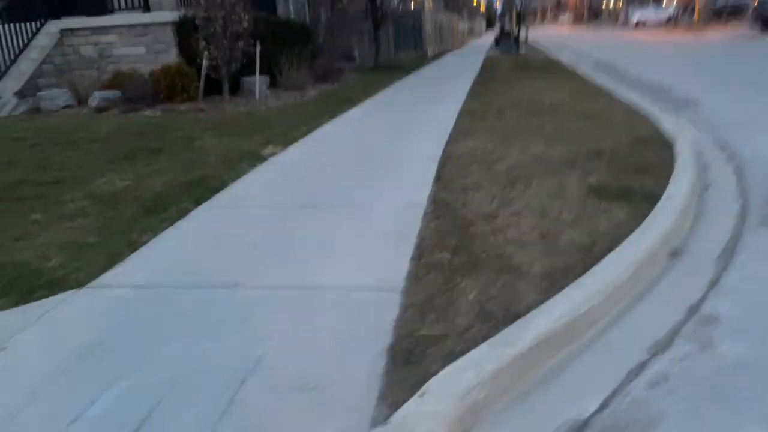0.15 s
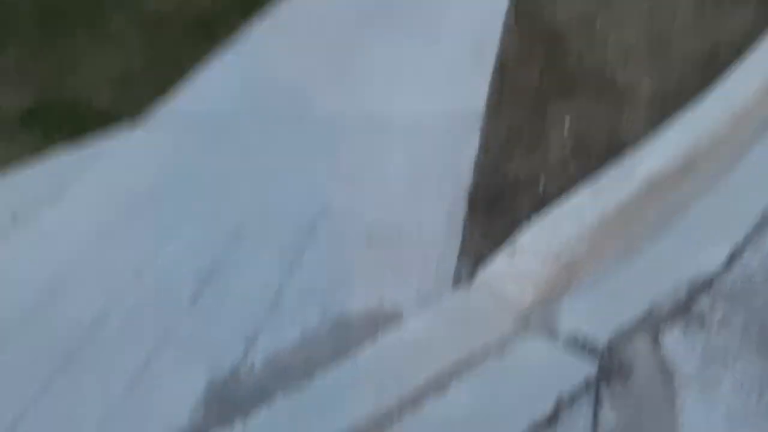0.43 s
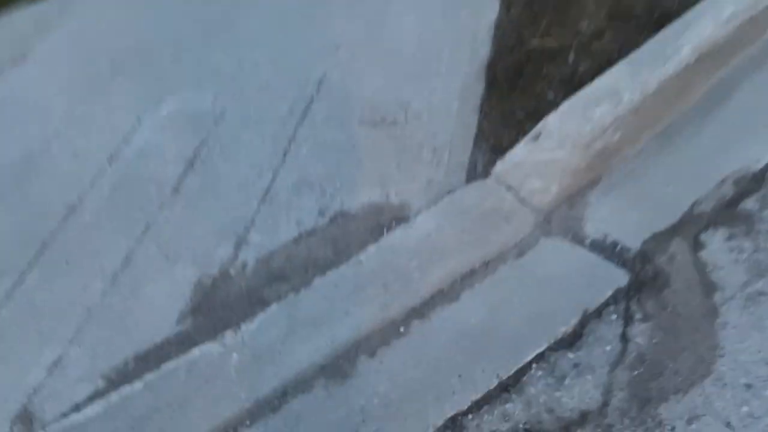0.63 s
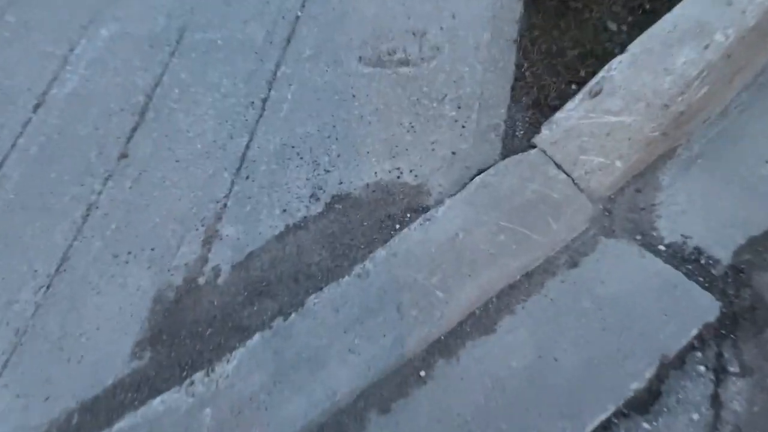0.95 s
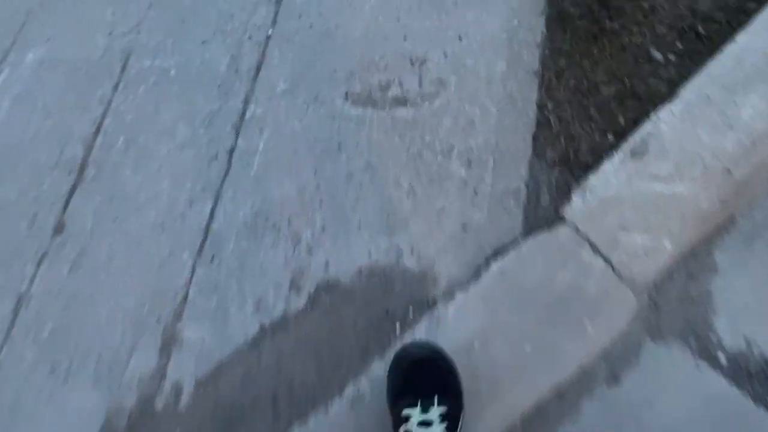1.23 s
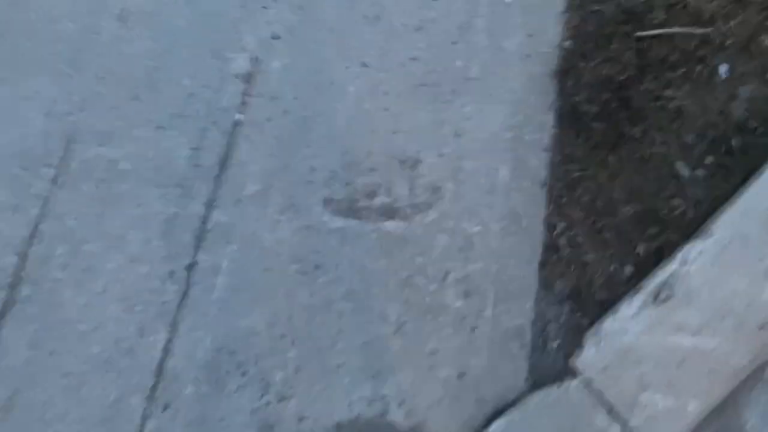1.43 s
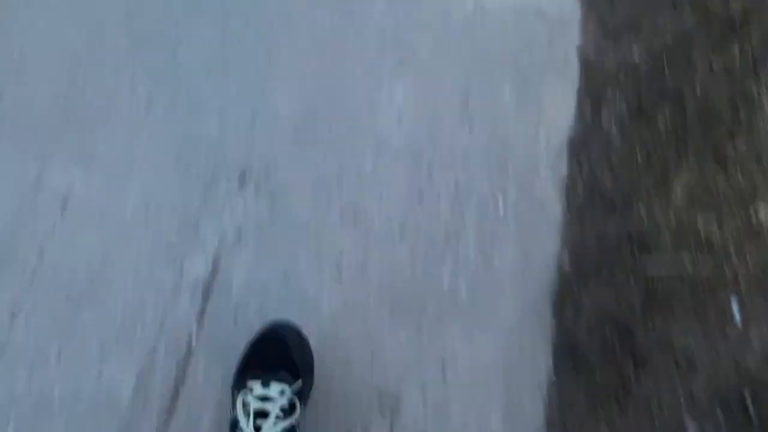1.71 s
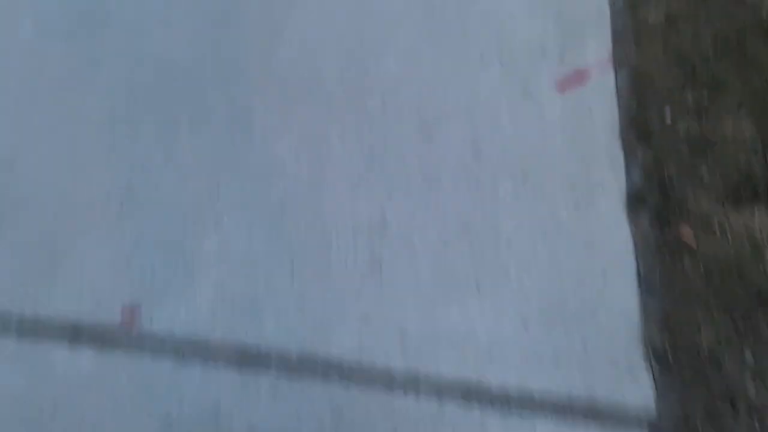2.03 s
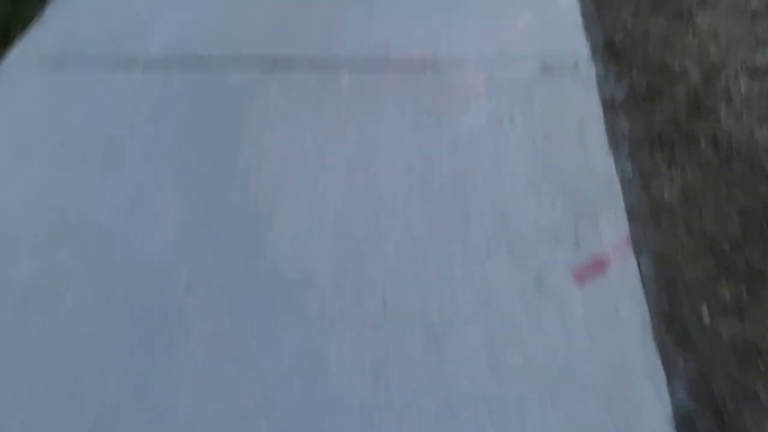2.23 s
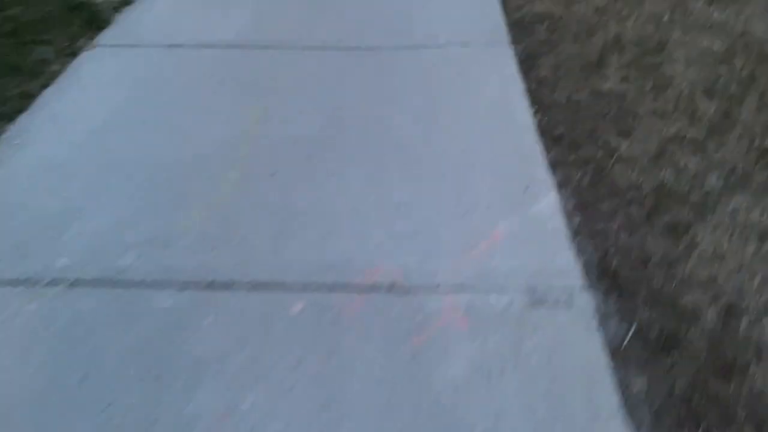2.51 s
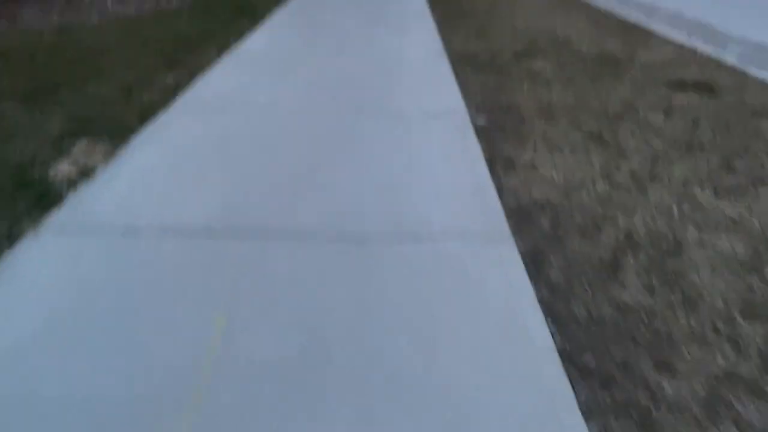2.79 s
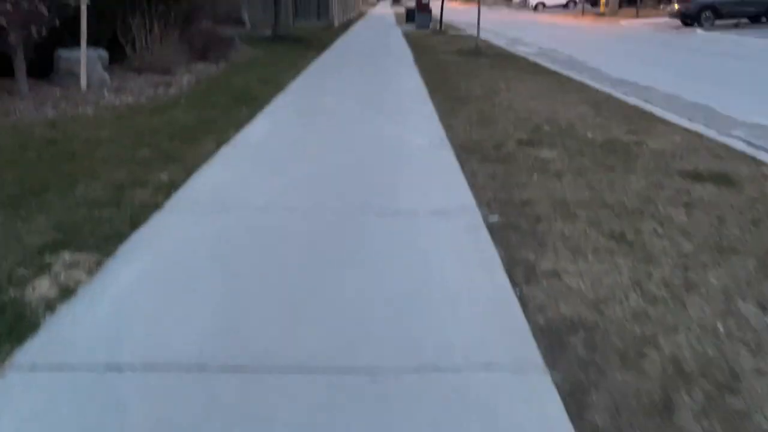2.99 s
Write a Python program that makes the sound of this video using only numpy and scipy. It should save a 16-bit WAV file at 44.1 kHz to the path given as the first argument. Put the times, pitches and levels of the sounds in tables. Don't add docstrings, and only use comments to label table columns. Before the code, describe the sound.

Footsteps thud and crunch over gritty pavement while wind puffs bump the microphone

```python
import sys
import numpy as np
from scipy import signal
from scipy.fft import rfft, irfft, next_fast_len
from scipy.io import wavfile
from scipy.ndimage import uniform_filter1d, map_coordinates

SR = 44100
rng = np.random.default_rng(int(sys.argv[2]) if len(sys.argv) > 2 else 0)


def volts_from_db(level):
    exponent = np.asarray(level, float) / 20
    return 10 ** exponent


def waveform_to_disk(signal):
    frames = np.transpose(np.atleast_2d(signal))
    scaled = np.clip(frames, -1, 1) * 32767
    samples = np.round(scaled).astype(np.int16)
    wavfile.write(sys.argv[1], SR, samples)


N = 138915

# (frequency [Hz], level [dB per Hz])
HUM_COLOR = [(100, -6.5), (1200, -10), (2500, -16.5), (16000, -84)]
# (time [s], level [dB])
AIR_FLOW = [(0, -41.5), (.25, -31.5), (.45, -28), (.6, -31.5), (.8, -27.5), (1, -33.5), (1.3, -23),
            (1.55, -30), (1.85, -29), (1.97, -34), (2.25, -31), (2.4, -29.5), (2.58, -37.5), (3.15, -34)]
# (frequency [Hz], level [dB per Hz])
RUMBLE_COLOR = [(25, -6), (52, 4.5), (140, -3), (300, -16), (600, -42.5)]
# (center time [s], peak level [dB], pitch [Hz], length [s])
AIR_PUFFS = [(0.501, -19.5, 79.3, 0.11), (0.54, -10, 77, 0.018), (0.713, -17, 85.6, 0.017),
             (0.903, -21.5, 79.4, 0.053), (1.106, -18.5, 86.5, 0.022), (1.141, -15, 69, 0.024),
             (1.196, -6.5, 63, 0.039), (1.265, -14, 105, 0.044), (1.315, -7, 87, 0.0067),
             (1.428, -10, 85, 0.011), (1.45, -9, 70, 0.009), (1.8, -18.5, 64.5, 0.02),
             (2.033, -27, 59, 0.043), (2.151, -20, 57.6, 0.023), (2.221, -11, 76.6, 0.0075),
             (2.301, -9.5, 65, 0.057), (2.364, -10.5, 62, 0.021), (2.452, -18.5, 76.6, 0.022),
             (2.724, -21, 73, 0.031), (2.818, -22, 71.6, 0.053), (2.889, -19.5, 67.6, 0.033)]
# (time [s], level [dB])
RUSTLE = [(0, -42.5), (.15, -48.5), (.35, -40.5), (.65, -42), (.87, -35), (1.1, -41.5), (1.55, -42),
          (1.9, -39.5), (2.1, -39.5), (2.4, -40.5), (2.62, -43.5), (2.85, -39), (3.15, -43)]
# (frequency [Hz], level [dB per Hz])
CLOTH_COLOR = [(250, 8.5), (700, 4), (2300, 0), (3200, -4.5), (6700, -6.5), (10000, -8), (13500, -37),
               (16300, -48)]
# (pitch [Hz], level [dB], time to fade by 60 dB [s])
TAG_MODES = [(6770, 2.5, 0.013), (9200, -2.5, 0.0076), (10260, -1.5, 0.0076), (15700, -8, .01)]
# (time [s], peak level [dB], ring over snap [dB])
TAG_TICKS = [(0.3186, -29.5, -25), (0.808, -25.5, -7), (0.9115, -27, -1), (0.9765, -25.5, -3.5),
             (1.201, -46, -11), (1.3187, -28, -18), (1.517, -24.5, -4), (1.629, -29.5, 2),
             (1.6362, -24.5, -9), (1.6941, -38, 12), (1.744, -35.5, 11.5), (1.7614, -18.5, -6),
             (1.9367, -20, 3.5), (1.9474, -22, 4.5), (1.9743, -34.5, 15.5), (2.011, -30.5, 3),
             (2.074, -33.5, 5), (2.3967, -25, -22), (2.9663, -32, -15), (2.98, -40, -13), (3.01, -37, -13),
             (3.053, -30.5, -14), (0.038, -46, 10), (.757, -28.5, -15), (1.045, -41, 11.5),
             (1.182, -36, 7.5), (1.712, -39, 10), (1.958, -36, 8), (2.085, -38, 5), (2.9105, -37, 10),
             (3.0864, -44, 11)]
# (frequency [Hz], width [Hz], level [dB])
SOLE_MODES = [(1120, 2000, 7), (2450, 1880, 6.5), (5550, 1650, 1.5), (11200, 4800, -7.5)]
# (start time [s], length [s], level [dB], treble [dB])
SOLE_SCUFFS = [
    (1.319, .054, -29, 0),
    (1.35, .022, -28, -12),
    (1.275, .03, -40, 0),
    (.808, .06, -44, 6),
    (.908, .018, -40, 4),
    (.7, .06, -43, -2),
    (1.845, .06, -42, 0),
]
# (time [s], peak level [dB], pitch [Hz], snap over ring [dB])
GRIT_CRACKS = [(0.209, -26.5, 1580, -30), (0.26, -19, 1450, 23), (0.267, -22.5, 1920, 22.5),
               (0.32, -25.5, 1630, -8), (0.361, -25.5, 2030, -11), (0.517, -25, 1060, 24),
               (0.64, -26.5, 1730, -24), (0.718, -20, 2080, 27.5), (1.289, -18, 1000, -18),
               (1.293, -8, 750, 13), (1.405, -21, 765, -21), (1.744, -31, 1860, -5),
               (1.761, -22.5, 696, -13), (1.837, -14, 664, 20), (1.928, -23.5, 3750, -24),
               (1.947, -27.5, 776, -13), (1.962, -23, 2470, -8), (2.171, -27.5, 860, -15),
               (2.333, -20, 1150, -2), (2.375, -16.5, 1210, -20), (2.397, -25.5, 2200, -13),
               (2.428, -20, 1970, -25), (2.702, -27, 750, -9), (2.821, -12.5, 1750, -16),
               (2.892, -18.5, 1800, -9), (.014, -32.5, 785, -7), (.037, -31, 1480, -5),
               (0.103, -37.5, 960, -10), (.431, -36, 1190, -5), (0.795, -28.5, 1460, 12),
               (0.841, -26.5, 1300, 1), (.851, -33, 1400, -3), (.979, -27, 840, -5),
               (.986, -24.5, 1950, -7), (1.138, -27.5, 1370, -10), (1.181, -32, 1760, 1),
               (1.2, -29.5, 2200, -6), (1.245, -32, 3330, 31), (1.712, -43, 810, 10),
               (1.896, -28.5, 1340, 14), (2.086, -28.5, 1730, -5), (2.094, -26, 1500, 3),
               (2.745, -26, 1400, 0), (2.795, -25.5, 1500, 21), (2.872, -34, 4030, 16),
               (2.914, -33, 1400, -5), (2.967, -33, 5240, -4), (2.974, -24, 5400, -4),
               (3.01, -23.5, 6000, 0), (3.053, -31.5, 770, 5), (1.355, -18.5, 1280, 5),
               (1.3615, -23, 2370, 0), (1.808, -26.5, 660, 2), (1.842, -19.5, 700, -2)]
# (time [s], peak level [dB], pitch [Hz], time to fade by 60 dB [s])
LANDINGS = [(0.206, -14, 197, 0.026), (0.533, -10.5, 154, 0.03), (0.721, -16.5, 186, 0.042),
            (1.2939, 2, 213, 0.012), (1.365, -14.5, 407, 0.013), (1.421, -20.5, 156, 0.059),
            (1.81, -7.5, 212, 0.026), (1.84, -3, 217, 0.016), (2.287, -8.5, 220, 0.02),
            (2.7985, -11.5, 190, 0.025), (2.365, -21, 430, 0.016), (1.806, -40, 427, 0.0091),
            (2.283, -29.5, 390, 0.01), (2.702, -15, 330, 0.0072)]
# (frequency [Hz], shared part [0 to 1])
PORTS_ALIKE = [(100, .78), (600, .5), (2500, .25), (5000, .5), (7300, .98), (9200, .98), (12000, .8)]
# (frequency [Hz], phase [radians])
LEFT_LEAD = [(400, 0), (1200, .8), (3500, 0), (4800, 0), (6600, -1.3), (8350, -3.14), (10900, -6),
             (12100, -6.5), (13900, -9), (15000, -9.42)]


def unit(x):
    return x / np.sqrt(np.mean(x ** 2) + 1e-20)


def along(points, hz):
    f, v = np.transpose(points)
    return np.interp(np.log(hz + 1), np.log(f + 1), v)


def curve(rows):
    return np.interp(np.arange(N) / SR, *np.transpose(rows))


def wobble(rate):
    knots = rng.standard_normal(int(N * rate / SR) + 4)
    return map_coordinates(knots, [np.arange(N) * rate / SR])


def filtered(x, response):
    m = next_fast_len(x.shape[-1] + 8192)
    shaped = rfft(x, m) * response(np.fft.rfftfreq(m, 1 / SR))
    return irfft(shaped, m)[..., :x.shape[-1]]


def peak(f, hz, width_hz):
    return 1j * f * width_hz / (hz * hz - f * f + 1j * f * width_hz)


def add(out, s, x):
    i = max(round(s * SR), 0)
    out[..., i:i + x.shape[-1]] += x[..., :N - i]


def spread(pair, spectrum):
    def middle_and_side(f):
        turn = np.arccos(np.clip(along(PORTS_ALIKE, f), 0, 1)) / 2
        color = volts_from_db(along(spectrum, f)) * (f > spectrum[0][0] / 2)
        return color * np.array([np.cos(turn), np.sin(turn)])

    mid, side = filtered(pair, middle_and_side)
    return unit(np.array([mid + side, mid - side]))


def town_hum():
    return volts_from_db(-47.5) * spread(rng.standard_normal((2, N)), HUM_COLOR)


def air():
    lumps_db, puff_spread, pitch_sag = 2, 0.2, 0.2
    lumps = np.array([wobble(6.79), wobble(9.3)]) + wobble(24.59)
    rumble = spread(rng.standard_normal((2, N)), RUMBLE_COLOR)
    out = volts_from_db(curve(AIR_FLOW) + lumps_db * lumps) * rumble
    t = np.arange(-SR // 10, SR // 10) / SR
    side = np.array([[1], [-1]])
    for s, db, hz, length in AIR_PUFFS:
        phase = rng.uniform(0, 2 * np.pi)
        skew, gain = rng.normal(0, puff_spread, 2)
        swell = np.exp(-2.8 * (t / length) ** 2)
        turn = 2 * np.pi * hz * t * (1 - pitch_sag * t / length)
        level = volts_from_db(db + side * (0.7 + 0.77 * gain))
        add(out, s - 1 / 10, level * swell * np.cos(turn + phase + side * skew))
    return out


def cloth_hiss():
    patch_db = 2.4
    z = signal.stft(rng.standard_normal((2, N)), nperseg=256)[2]
    patches = rng.standard_normal(z.shape[1:])
    patches = uniform_filter1d(uniform_filter1d(patches, 8, 0), 8, 1)
    return unit(signal.istft(z * volts_from_db(patch_db * unit(patches)), nperseg=256)[1][:, :N])


def cloth_crackle():
    per_s, center_hz, octaves, fade_cycles, spread_db = 260, 1400, 0.8, 4, 4
    when, pitch, size, pan, keep = rng.uniform(size=(2000, 5)).T
    k = np.arange(300)
    hz = center_hz * 2 ** (octaves * 2 * (2 * pitch[:, None] - 1))
    cycles = hz * k / SR
    grains = np.sin(2 * np.pi * cycles) * volts_from_db(-60 * cycles / fade_cycles) * np.sqrt(hz)
    kept = keep < per_s * N / SR / 2000
    grains *= (volts_from_db(-spread_db * np.log(size + 0.023)) * kept)[:, None]
    spots = ((when * N).astype(int)[:, None] + k).ravel()

    def placed(gain):
        return np.bincount(spots, (grains * gain[:, None]).ravel(), N + 300)[:N]

    return unit(np.array([placed(np.ones(2000)), placed(2 * pan - 1)]))


def clothes():
    crackle_db, flutter_db = -12, 1.5
    fabric = cloth_hiss() + volts_from_db(crackle_db) * cloth_crackle()
    return volts_from_db(curve(RUSTLE) + flutter_db * wobble(21.55)) * spread(fabric, CLOTH_COLOR)


def street(x):
    walls_db, fade_s, dull_hz = -7, 0.04, 4000
    t = np.arange(SR // 5) / SR
    tail = rng.standard_normal((2, len(t))) * volts_from_db(-60 * t / fade_s) * (t > 0.002)
    dull = filtered(x, lambda f: 1 / (1 + 1j * f / dull_hz) ** 2)
    return volts_from_db(walls_db) * signal.fftconvolve(dull, tail / np.linalg.norm(tail[0]), axes=1)[:, :N]


def tag():
    tick_db, snap_s, scatter_db, detune = -4.5, 0.021, 2.5, 0.012
    out, t = np.zeros((2, N)), np.arange(SR // 20) / SR
    for s, db, ring_db in TAG_TICKS:
        ring = np.zeros(len(t))
        for hz, mode_db, t60 in TAG_MODES:
            fade = volts_from_db(mode_db + rng.normal(0, scatter_db) - 60 * t / t60)
            ring += fade * np.sin(2 * np.pi * hz * rng.normal(1, detune) * t)
        ring *= 1 - np.exp(-t / 0.00031)
        snap = filtered(rng.standard_normal(len(t)), lambda f: peak(f, 8400, 12700))
        snap *= volts_from_db(-60 * t / snap_s) + 0.6 * volts_from_db(-60 * t / 0.0036)
        add(out, s, volts_from_db(db + tick_db) * (volts_from_db(ring_db) * ring + snap))
    return out


def scuffs():
    grain_db, surge_db, start_s, lift_s = 4.5, 2.5, 0.00042, 0.007
    out = np.zeros((2, N))
    for s, length, db, treble_db in SOLE_SCUFFS:
        def sole(f):
            total = 0
            for k, (hz, width_hz, mode_db) in enumerate(SOLE_MODES):
                level = volts_from_db(mode_db + treble_db * (k > 1))
                total = total + (-1) ** k * level * peak(f, hz, width_hz)
            return total

        t = np.arange(int(length * SR) + 400) / SR
        grains = rng.standard_normal((3, len(t)))
        grains = grains[0] + 0.34 * grains[1:]
        grains = grains * volts_from_db(grain_db * wobble(600)[:len(t)] + surge_db * wobble(111)[:len(t)])
        edges = np.clip(np.minimum(t / start_s, (length - t) / lift_s), 0, 1)
        add(out, s, volts_from_db(db) * unit(filtered(grains, sole)) * edges)
    return out


def grit():
    lead_in_s, rise_cycles, fade_cycles, sag = 0.011, 0.36, 8.4, 0.076
    snap_s, crumbs_s, crumbs_db, scatter_db = 0.0062, 0.087, -27, 5
    right_db, center_hz = 4, 900
    out, t = np.zeros((2, N)), np.arange(SR // 10) / SR
    late = np.maximum(t - lead_in_s, 0)
    for s, db, hz, snap_db in GRIT_CRACKS:
        noise = filtered(rng.standard_normal((3, len(t))),
                         lambda f: peak(f, 2200, 5200) ** 2 / (1 + (f / 5040) ** 4))

        shape = volts_from_db(-60 * late * hz / fade_cycles) * (1 - np.exp(-late * hz / rise_cycles)) ** 2
        turns = hz * late + 3 * sag * (1 - np.exp(-hz * late / 3))
        overtones = np.sin(3.4 * np.pi * turns + rng.uniform(0, 10.1)) + 0.35 * np.sin(6 * np.pi * turns)
        ring = shape / shape.max() * (np.sin(2 * np.pi * turns) + 450 / hz * overtones)

        snap = (noise[0] + 0.69 * noise[1:]) * volts_from_db(-60 * late / snap_s) * (late > 0.0008)
        snap = snap / abs(snap).max() * volts_from_db(snap_db - 22.5)

        scatter = rng.standard_normal(len(t) // 40 + 1).repeat(40)[:len(t)]
        swell = volts_from_db(crumbs_db - 60 * abs(t - lead_in_s - 0.001) / crumbs_s)
        crumbs = unit(noise[1:]) * volts_from_db(scatter_db * scatter) * swell

        lean_db = np.array([[-right_db], [right_db]]) / 2 * np.clip(np.log2(hz / center_hz), -1, 1)
        add(out, s - lead_in_s + 0.00051, volts_from_db(db + lean_db) * (ring + snap + crumbs))
    return out


def heels():
    damping, thud_db, thud_s = 1.435, -9.5, 0.033
    out, t = np.zeros((2, N)), np.arange(SR // 10) / SR
    for s, db, hz, t60 in LANDINGS:
        noise = rng.standard_normal((2, len(t)))
        thud = unit(filtered(noise, lambda f: peak(f, 1.89 * hz, 1.07 * hz) ** 2))
        thud = thud[0] + 0.22 * thud[1] * np.array([[1], [-1]])
        add(out, s, volts_from_db(db + thud_db - 60 * t / thud_s) * (1 - np.exp(-t / 0.0027)) * thud)

        fade = volts_from_db(db + 6.5 - 60 * (t / t60) ** damping)
        attack = (1 - np.exp(-t / 0.0024)) ** 2
        bent_t = t + 0.0028 * (1 - np.exp(-t / 0.00067))
        add(out, s, fade * attack * np.sin(2 * np.pi * hz * bent_t))
    return out


def scene():
    near = heels() + grit() + scuffs() + tag()
    return near + street(near) + clothes() + air() + town_hum()


def roll_off(x):
    return signal.sosfilt(signal.butter(12, 16500, fs=SR, output="sos"), x)


def record(dry):
    top_hz, low_hz, ceiling = 16500, 36, 0.85

    def ports(f):
        shift = np.exp(0.5j * np.outer([1, -1], along(LEFT_LEAD, f)))
        return shift * (f < top_hz) * (f / (f - 1j * low_hz)) ** 2

    x = filtered(dry, ports)
    mix = x / (1 + abs(x / ceiling) ** 6) ** (1 / 6)
    return roll_off(mix)


dry = scene()
out = record(dry)
waveform_to_disk(out)
```